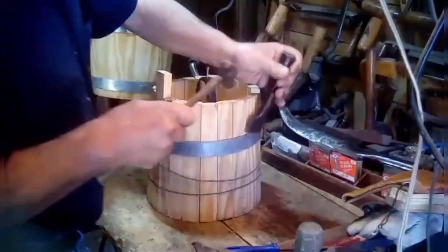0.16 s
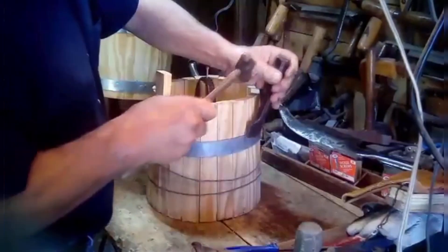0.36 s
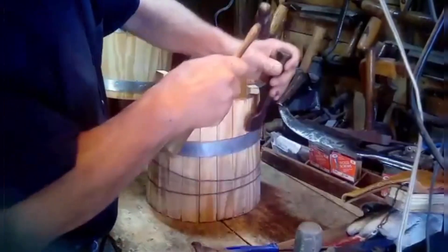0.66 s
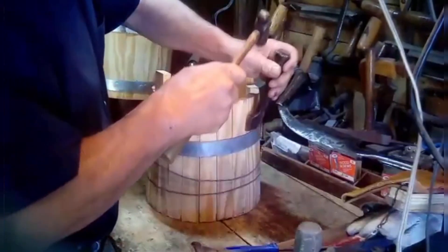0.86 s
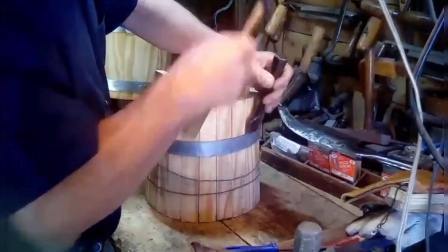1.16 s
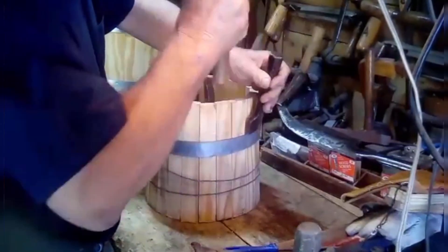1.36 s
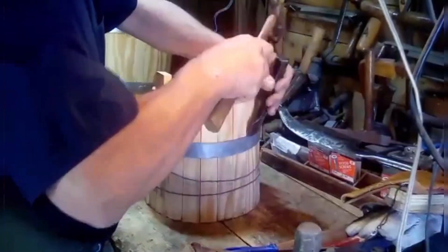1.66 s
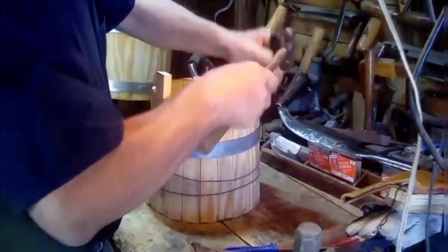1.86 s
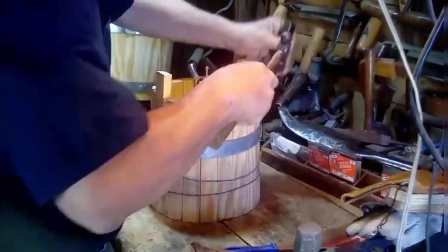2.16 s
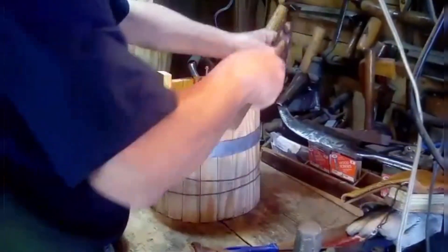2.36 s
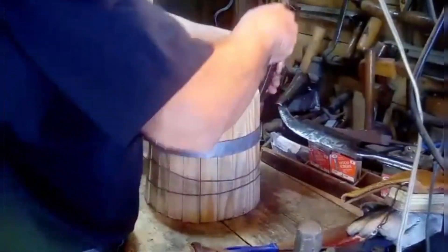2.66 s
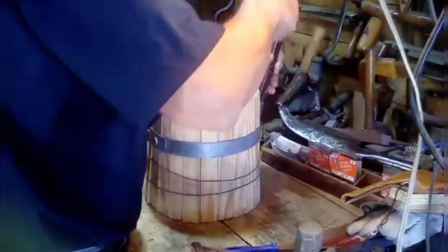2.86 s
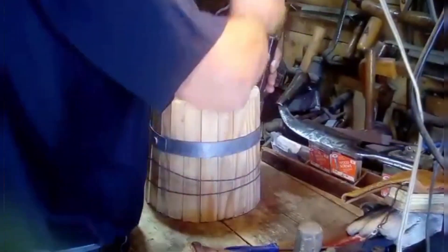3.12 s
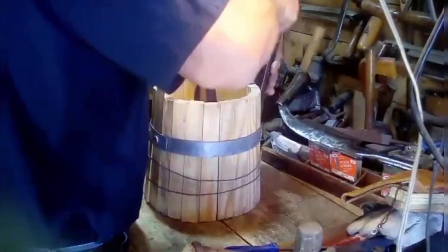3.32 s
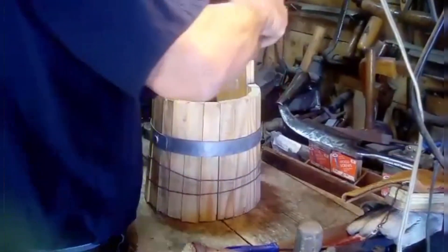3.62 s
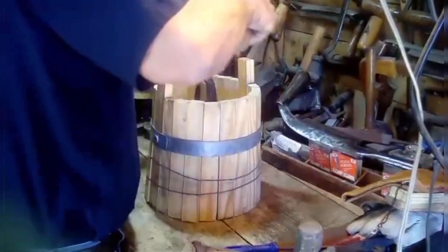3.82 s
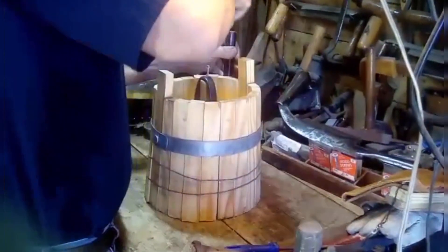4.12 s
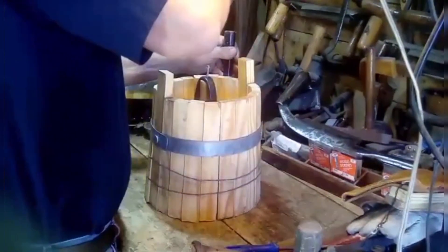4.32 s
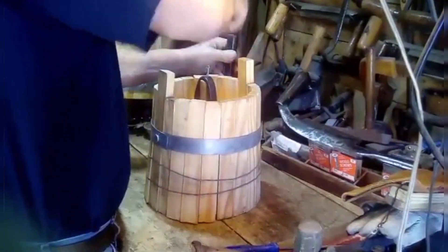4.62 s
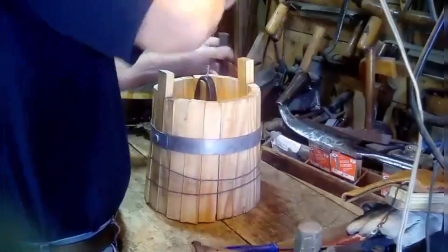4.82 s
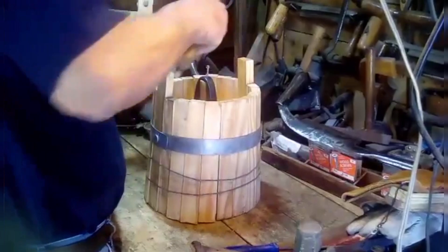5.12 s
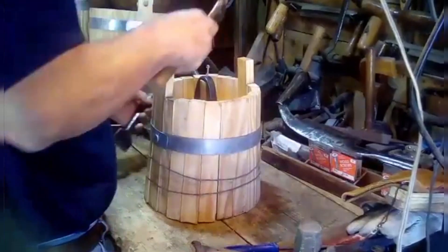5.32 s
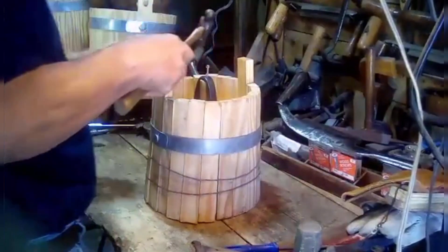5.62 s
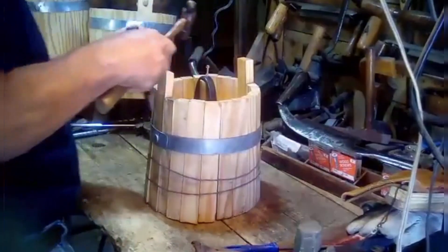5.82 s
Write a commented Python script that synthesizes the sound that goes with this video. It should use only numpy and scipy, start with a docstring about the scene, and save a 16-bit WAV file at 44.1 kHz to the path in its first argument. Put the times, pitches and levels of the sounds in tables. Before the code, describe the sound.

Close by in a small workshop, a steel driver is set against a wooden bucket with a quick cluster of light knocks. It scrapes softly twice along the hoop around 0.4 and 0.5 seconds, then taps at 0.7 and 0.9. Three loud hammer blows land at about 1.5, 3.1 and 4.5 seconds. Each is a sharp, slightly clipped steel crack with a brief high ring and a short room echo. The first two thump the staves and bench; the third has less wood and a brighter ring. Light wooden knocks fall between the blows, around 1.9, 2.2, 2.5, 3.7 and 3.9 seconds. A soft knock at 5.8 leads to a last sharp tap just before 6 seconds. Underneath, very faintly, a low motor hums and wavers, sleeves and feet shuffle, and a few tiny squeaks come and go.

```python
"""A cooper's bench in a small workshop, one microphone close by. The steel driver is set against a wooden
bucket, slid twice along the hoop and tapped. From about 1.5 s three hard hammer blows drive the hoop down:
steel cracks, the driver rings, staves and bench thump, and the microphone clips and its gain dips.
Light taps and faint squeaks fall between the blows and after them, with a last sharp tap near 6 s.
Behind it all a motor hums, sleeves and feet shuffle, and the room answers each contact."""
import sys
import numpy as np
from scipy import signal
from scipy.fft import rfft, irfft, next_fast_len
from scipy.io import wavfile
from scipy.ndimage import map_coordinates

SR = 44100
rng = np.random.default_rng(int(sys.argv[2]) if len(sys.argv) > 2 else 0)


def dump_mix(stems):
    """Bounce the given channels to the path in sys.argv[1] as a 16-bit WAV at rate SR."""
    frames = np.atleast_2d(stems).T  # one column per channel
    limited = np.clip(frames, -1, 1)  # hard clip at full scale
    pcm = np.round(limited * 32767).astype(np.int16)
    wavfile.write(sys.argv[1], SR, pcm)


N = 263718

# Resonances of the bucket's wooden wall. Each row: centre in Hz, width in Hz, gain in dB.
STAVE_MODES = [(294, 100, 2), (470, 200, 3), (670, 210, 3), (916, 210, 0.5), (1266, 390, 1.5),
               (1900, 460, -0.5), (2760, 440, -7.5)]
# Resonances of the steel hoop. Each row: centre in Hz, width in Hz, gain in dB.
HOOP_MODES = [(4900, 41, -6), (5180, 23, -3), (5950, 40, -2), (6520, 65, 1), (7440, 78, -11)]


def hammer():
    """Hard blows ring the driver and thump the bucket."""
    # Each row: start in seconds, energy of crack, staves and bench in dB, the driver's six ring
    # levels in dB, contact hardness in Hz, time the room takes to answer in seconds.
    blows = [(1.473, 13.8, 15.45, 6, -47, -29.5, -17.5, -19.5, -26.5, -35.5, 4900, 0.002),
             (3.1362, 15, 14, 4, -40.5, -34.5, -24, -16, -20.5, -33.5, 6040, 0.002),
             (4.5426, 11, 4.9, -7, -19, -16.5, -17.5, -7, -25, -24, 6000, .04)]
    out, t = np.zeros(N), np.arange(SR // 2) / SR
    for start, crack_db, staves_db, bench_db, *ring_db, contact_hz, build_s in blows:
        add(out, start, knock(t, crack_db, staves_db, bench_db, crack_t60=0.02, chatter_t60=0.018,
                              contact_hz=contact_hz, rise_s=0.001, wet_db=-1.2, build_s=build_s))
        add(out, start, workshop(driver_ring(t, ring_db), wet_db=-11, build_s=0.01))
    return out


def knock(t, crack_db, staves_db, bench_db, crack_t60, chatter_t60, contact_hz, rise_s, wet_db, build_s):
    """A contact: a steel crack, a short chatter in the staves and a push on the bench, then the room."""
    # Steel on steel. Each row: frequency in Hz, level in dB.
    crack_spectrum = [(1200, -32), (2500, 0.5), (4200, -7.5), (6500, 3), (7600, -5), (8600, -11),
                      (10500, -17.5), (12500, -19), (14000, -24.5), (15300, -43)]
    # The bench top under the bucket. Each row: centre in Hz, width in Hz, gain in dB.
    bench_modes = [(88.4, 98, -6), (159, 21, 7.5), (254, 160, -4)]

    def wood(hz):  # wood yields: little treble gets in
        return resonances(STAVE_MODES)(hz) / (1 + 1j * hz / contact_hz) ** 2

    onset = 1 - np.exp(-t / rise_s)
    crack = coloured(crack_spectrum, len(t)) * amp(-60 * t / crack_t60) * onset
    chatter = filtered(rng.standard_normal(len(t)) * amp(-60 * t / chatter_t60) * onset, wood)
    push = t * np.exp(-t / 0.0017)
    thud = at_energy(filtered(push, resonances(bench_modes)), bench_db)
    direct = at_energy(crack, crack_db) + at_energy(chatter, staves_db) + thud
    # the walls hear the contact from all sides, so only its average colour reaches them
    pulse = signal.unit_impulse(len(t), 128)
    steel = filtered(pulse, spectrum(crack_spectrum))
    to_walls = at_energy(steel, crack_db) + at_energy(filtered(pulse, wood), staves_db) + thud
    return workshop(direct, wet_db, build_s, feed=to_walls)


def driver_ring(t, ring_db):
    """The driver's modes: a bright first flash, then a ring that is slightly unsteady in the hand."""
    # Six groups, low to high. Each mode: frequency in Hz, level in dB, time to fall 60 dB in seconds.
    mode_groups = [
        [(786, -3, .08), (1642, 0, .1), (1933, -3, .09), (2078, -3, .12), (3480, -8, .08), (3860, -5, .08)],
        [(2644, -7, .1), (2810, 2.5, .32), (2922, -9, .1)],
        [(5402, 0, .24)],
        [(7295, -3, .22), (7382, -3, .18), (7474, 0, .26), (7540, -4, .1), (7625, -6, .08)],
        [(12340, 0, .08)],
        [(13650, 0, .14)],
    ]
    out = np.zeros(len(t))
    for group, group_db in zip(mode_groups, ring_db):
        for hz, db, t60 in group:
            drift = .02 * np.cumsum(rng.standard_normal(len(t)))
            level = amp(group_db + db + rng.normal(0, 1.5) - 60 * t / t60)
            out += level * np.sin(2 * np.pi * hz * t + drift)
    onset = 1 - np.exp(-t / .0015)
    flash = 1 + 2.5 * np.exp(-t / .006)
    return out * onset * flash


def taps():
    """Driver or bucket set against something: mostly wood, with a steel tick and a clink of the hoop."""
    # Each row: start in seconds, energy of tick, staves and bench in dB, contact hardness in Hz.
    contacts = [(0.1045, -34, -1.5, -11, 1167), (0.1121, -15.5, -6, -30, 1540),
                (0.1398, -19, -12, -6.5, 1507), (0.1689, -23, -12.5, -16, 1570),
                (0.3245, -34, -35, -44, 1600), (0.6883, -33, -2, -22, 1040), (0.8738, -11, 0, -3, 1370),
                (1.3064, -52.5, -22.5, -20, 1220), (1.8824, -34.5, -4.5, -41, 1525),
                (2.157, -34.5, 1.5, -6.5, 1141), (2.465, -31, -7.5, -15, 1616),
                (3.7076, -44.5, -10, -23, 863), (3.9303, -6.5, -3, -6.5, 2010),
                (4.0317, -61, -13, -16.5, 591), (5.781, -53, -30.5, -44, 1500),
                (5.7975, -33.5, -8, -23, 1110), (5.9497, 0.8, 0, -16.5, 1940)]
    out, t = np.zeros(N), np.arange(SR // 4) / SR
    for start, tick_db, staves_db, bench_db, contact_hz in contacts:
        add(out, start, knock(t, tick_db, staves_db, bench_db, crack_t60=0.039, chatter_t60=0.078,
                              contact_hz=contact_hz, rise_s=0.00052, wet_db=-7, build_s=.002))
        clink = filtered(rng.standard_normal(len(t)) * amp(-60 * t / 0.023), resonances(HOOP_MODES))
        add(out, start, at_energy(clink, tick_db - 4.5))
    return out


def slide():
    """The driver dragged on the hoop: dense uneven grains hiss, ring the hoop and feed the staves."""
    # Each row: time full speed is reached and time held in seconds, hiss and staves levels in dB.
    strokes = [(0.38, 0.037, -43, -61), (0.496, 0.033, -40.5, -60)]
    # Rough steel rubbing. Each row: frequency in Hz, spectral density in dB.
    hiss_spectrum = [(1180, 4.5), (2000, 3), (3420, -7), (4060, -10), (6410, 0), (7010, -10.5),
                     (13100, -33.5), (14000, -39)]
    rise_db_per_s, fall_db_per_s = 347, 466
    out, t = np.zeros(N), np.arange(N) / SR
    grit = amp(1.6 * wobble(730)) * rng.standard_normal(N)
    hiss = unit(filtered(grit, spectrum(hiss_spectrum)))
    hiss += amp(-10) * unit(filtered(grit, resonances(HOOP_MODES)))
    wood = unit(filtered(grit, resonances(STAVE_MODES)))
    for at, held, hiss_db, staves_db in strokes:
        before, after = np.maximum(at - t, 0), np.maximum(t - at - held, 0)
        speed = amp(-rise_db_per_s * before - fall_db_per_s * after)
        out += speed * (amp(hiss_db) * hiss + amp(staves_db) * wood)
    return workshop(out, wet_db=-10.5, build_s=0.0035)[:N]


def squeaks():
    """Faint, short glides, roughened by a jittering phase."""
    # Each row: start and length in seconds, first and last pitch in Hz, level in dB,
    # phase jitter in radians per sample.
    glides = [(2.33, 0.15, 2290, 2827, -58, 0.11), (2.794, 0.14, 1470, 1288, -66.5, 0.068),
              (5.148, 0.038, 2600, 2535, -64, 0.08), (5.589, 0.0525, 1592, 1716, -62, 0.24),
              (5.79, 0.24, 6080, 6350, -70.5, 0.11)]
    out, t = np.zeros(N), np.arange(SR // 4) / SR
    for start, length, first_hz, last_hz, db, jitter in glides:
        progress = np.minimum(t / length, 1)
        hz = first_hz + (last_hz - first_hz) * progress
        phase = np.cumsum(2 * np.pi * hz / SR + jitter * rng.standard_normal(len(t)))
        glide = amp(db) * np.sin(np.pi * progress) * np.sin(phase)
        add(out, start, workshop(glide, wet_db=-9, build_s=.005))
    return out


def motor():
    """A motor somewhere off in the shop: three wavering harmonics, their pitch slowly sagging."""
    # The second harmonic swells and fades. Each row: time in seconds, level in dB.
    second_levels = [(0, -54), (.9, -49), (1.15, -60), (2.2, -72.5), (2.55, -50.5), (2.85, -63), (3.3, -50),
                     (3.9, -48), (4.4, -54), (5.15, -48.5), (5.98, -53)]
    hum_hz, sag_hz_per_s = 79.64, .4
    out, t = np.zeros(N), np.arange(N) / SR
    hz = (hum_hz - sag_hz_per_s * t) * (1 + .005 * wobble(2.2))
    phase = 2 * np.pi * np.cumsum(hz) / SR
    first_db, third_db = (-56 + 1.5 * wobble(5.1) for _ in range(2))
    second_db = np.interp(t, *np.transpose(second_levels))
    for order, db in enumerate([first_db, second_db, third_db], 1):
        flutter = unit(amp(1.2 * wobble(9)))
        out += amp(db) * flutter * np.sin(order * phase + 0.36 * wobble(9.9))
    return out


def shuffling():
    """Sleeves, hands and feet rub in soft, patchy swells of noise."""
    # Each row: middle and half length in seconds, level in dB.
    movements = [(.08, 0.27, -62), (1.1, .06, -64), (1.403, .15, -66.5), (2.3, 0.13, -53),
                 (2.483, .06, -61), (3.05, 0.14, -65.5), (3.6, .12, -66.5), (3.958, 0.092, -58.5),
                 (4.476, .15, -67), (4.93, 0.068, -62), (5.162, 0.16, -58.5), (5.503, .2, -83)]
    # Rubbing cloth. Each row: frequency in Hz, spectral density in dB.
    cloth_spectrum = [(200, -17.5), (350, 3.5), (700, 3.5), (1300, -12), (2500, -20.5), (4500, -36.5),
                      (8000, -31.5), (12000, -54)]
    t = np.arange(N) / SR
    swells = sum(amp(db) * np.exp(-((t - middle) / half) ** 2) for middle, half, db in movements)
    patches = amp(2 * wobble(25))
    return swells * patches * coloured(cloth_spectrum, N)


def room_tone():
    """The shop's air: a low, gently wavering rumble under a trace of hiss."""
    # Each row: frequency in Hz, spectral density in dB.
    air_spectrum = [(20, -9), (45, -6), (60, -3.5), (72, 1), (90, -10.5), (120, -3.5), (230, -15),
                    (350, -15.5), (630, -26), (1200, -32.5), (3500, -41.5), (8400, -44.5), (10000, -59.5),
                    (14000, -65.5)]
    return amp(-58.5 + 1.5 * wobble(2.8)) * coloured(air_spectrum, N)


def workshop(sound, wet_db, build_s, feed=None):
    """The direct sound plus the room's tail (driven by feed, if given), which dies band by band."""
    # Each row: frequency in Hz, time to fall 60 dB in seconds.
    decay_times = [(60, 0.45), (160, 0.62), (420, .5), (1100, .48), (2910, 0.42), (7680, 0.27),
                   (11000, 0.25), (14000, 0.1)]
    hz, t, bands = signal.stft(rng.standard_normal(int(.7 * SR)), SR, nperseg=256)
    decay = amp(-60 * t / along(decay_times, hz)[:, None])
    tail = signal.istft(bands * decay, SR, nperseg=256)[1]
    tail *= 1 - np.exp(-(np.arange(len(tail)) / SR / build_s) ** 4)
    wet = signal.fftconvolve(sound if feed is None else feed, at_energy(tail, wet_db))
    return np.pad(sound, (0, len(tail) - 1)) + wet


def amp(db):
    return 10 ** (np.asarray(db) / 20)


def unit(x):
    """x scaled to rms 1."""
    return x / np.sqrt(np.mean(x ** 2) + 1e-20)


def at_energy(x, db):
    """x scaled to a total energy in dB."""
    return amp(db) * x / np.linalg.norm(x)


def along(points, hz):
    """Interpolates (Hz, value) points on a log frequency axis."""
    knots_hz, values = np.transpose(points)
    return np.interp(np.log(hz + 1), np.log(knots_hz + 1), values)


def spectrum(points):
    """Frequency response through (Hz, dB) points."""
    return lambda hz: amp(along(points, hz))


def resonances(modes):
    """Causal response of a set of broad resonances, alternating in sign."""
    return lambda hz: sum((-1) ** k * amp(db) * 1j * hz * width / (centre**2 - hz**2 + 1j * hz * width)
                          for k, (centre, width, db) in enumerate(modes))


def filtered(x, response):
    """x passed through a complex frequency response."""
    size = next_fast_len(len(x) + 8192)
    return irfft(rfft(x, size) * response(np.fft.rfftfreq(size, 1 / SR)), size)[:len(x)]


def coloured(points, size):
    """Noise of rms 1 with the given spectrum."""
    return unit(filtered(rng.standard_normal(size), spectrum(points)))


def wobble(rate):
    """A smooth random curve, rate knots a second."""
    return map_coordinates(rng.standard_normal(N // 64), [np.arange(N) * rate / SR])


def add(track, start_s, sound):
    """Mixes a sound into the track."""
    part = track[round(start_s * SR):][:len(sound)]
    part += sound[:len(part)]


def scene():
    """Everything that reaches the microphone at the bench, in mono."""
    return (hammer() + taps() + slide() + squeaks() + motor() + shuffling() + room_tone())[None]


def record(dry):
    """The microphone's gain ducks just after a loud blow, whose first cycles clip; the band is limited."""
    # Each row: frequency in Hz, gain in dB.
    microphone = [(20, -16), (45, -13), (66, -1), (100, 0), (13900, 0), (14500, -16), (15300, -34)]
    follow_s, ceiling, top_hz = 0.075, .68, 15300
    pole = np.exp(-1 / (follow_s * SR))
    loudness = np.sqrt(np.abs(signal.lfilter([1 - pole], [1, -pole], dry[0] ** 2)))
    ducked = dry[0] / (1 + loudness / amp(-7.5)) ** 0.33
    clipped = ducked / (1 + np.abs(ducked / ceiling) ** 5) ** (1 / 5)
    return filtered(clipped, lambda hz: spectrum(microphone)(hz) * (hz < top_hz))[None]


dry = scene()
out = record(dry)
dump_mix(out)
```